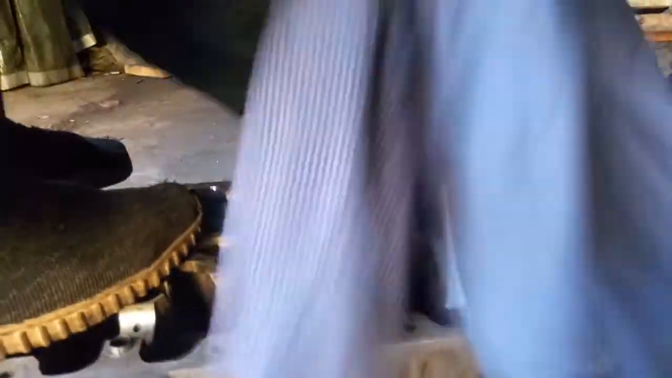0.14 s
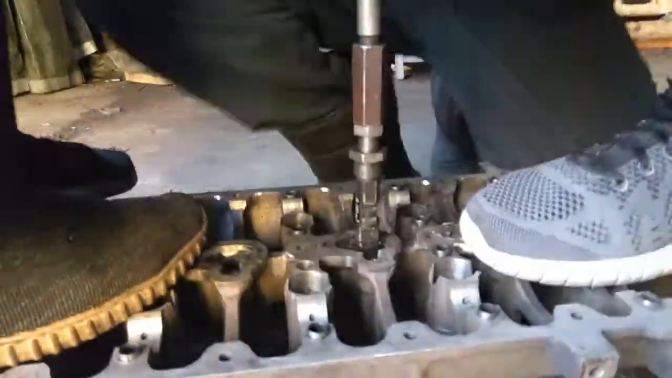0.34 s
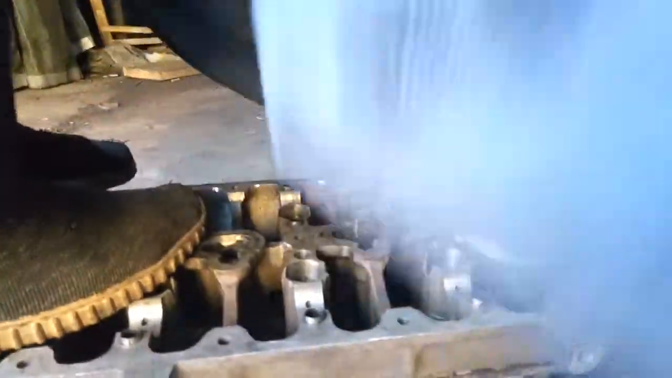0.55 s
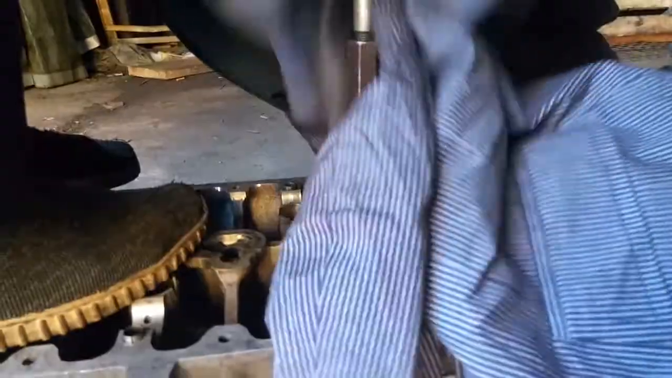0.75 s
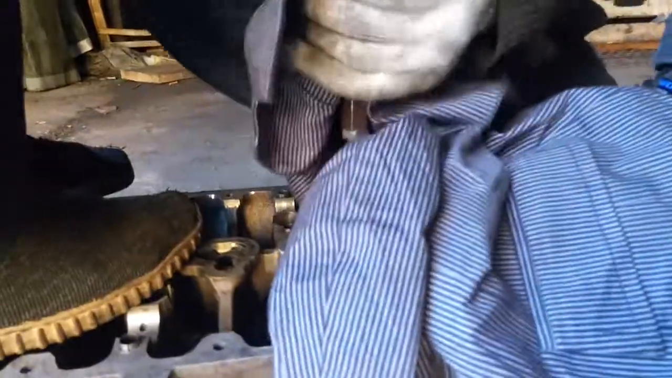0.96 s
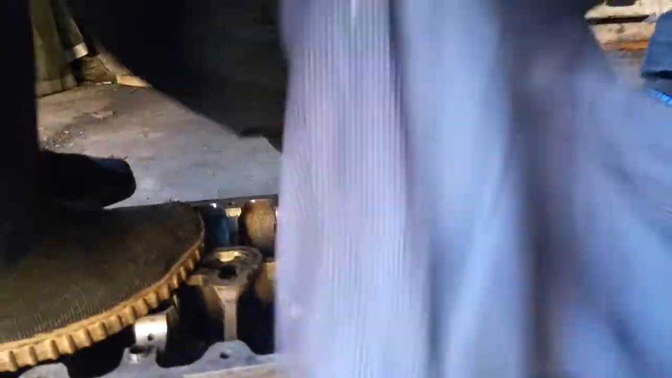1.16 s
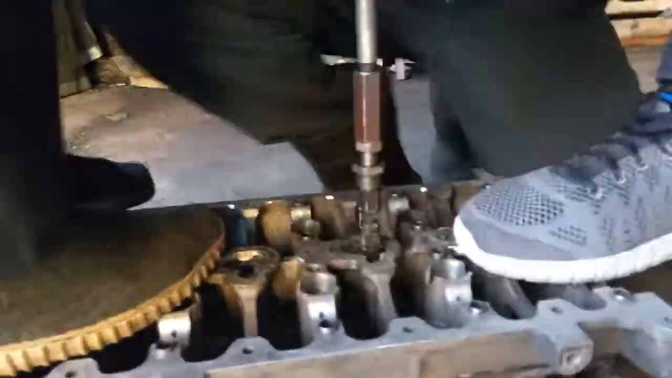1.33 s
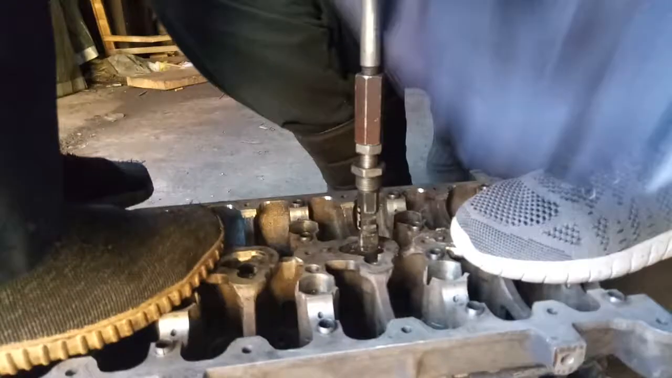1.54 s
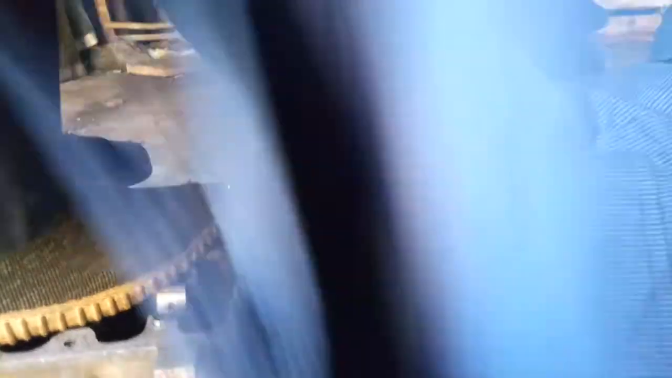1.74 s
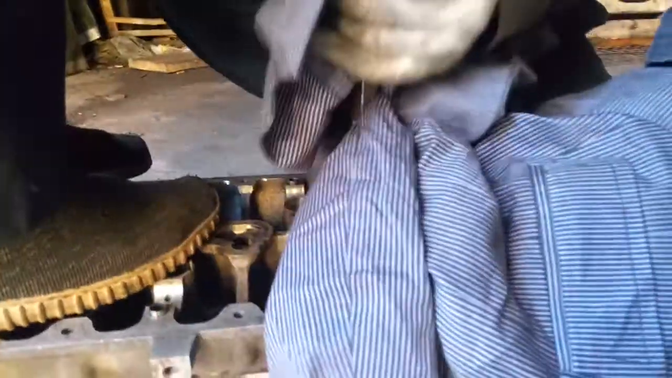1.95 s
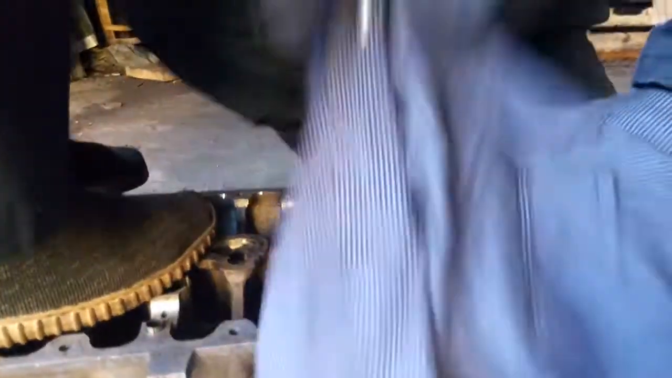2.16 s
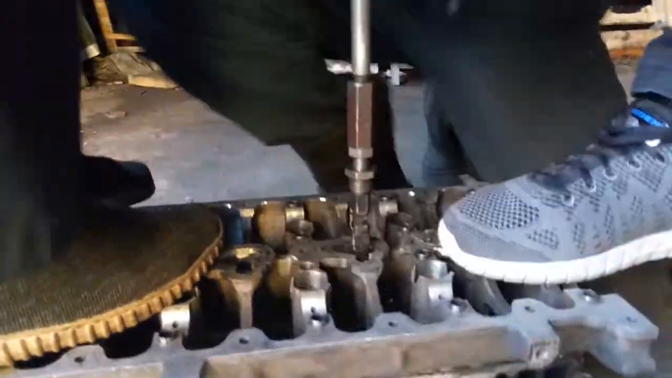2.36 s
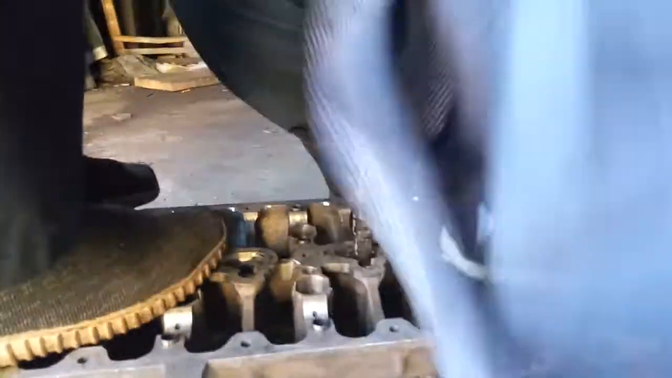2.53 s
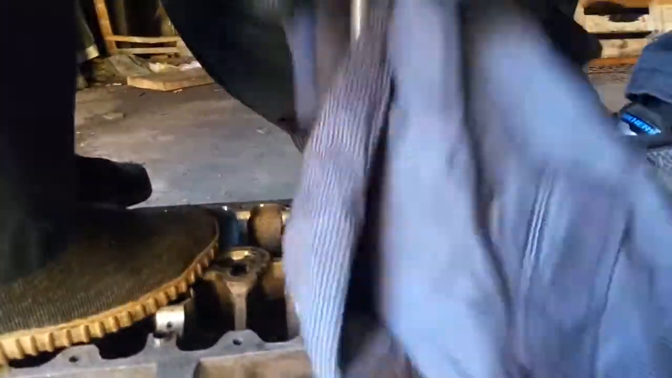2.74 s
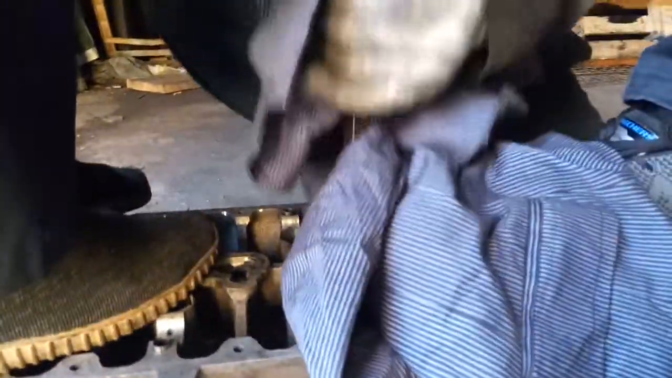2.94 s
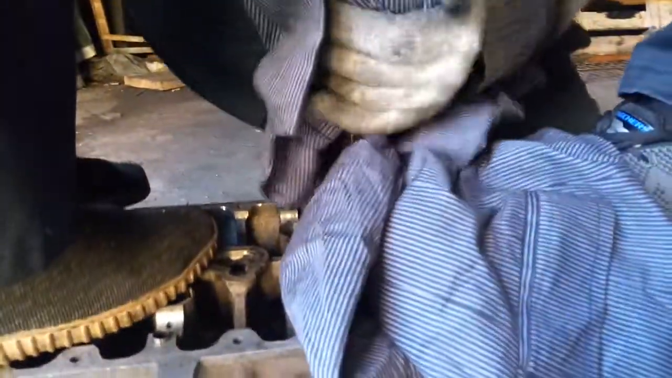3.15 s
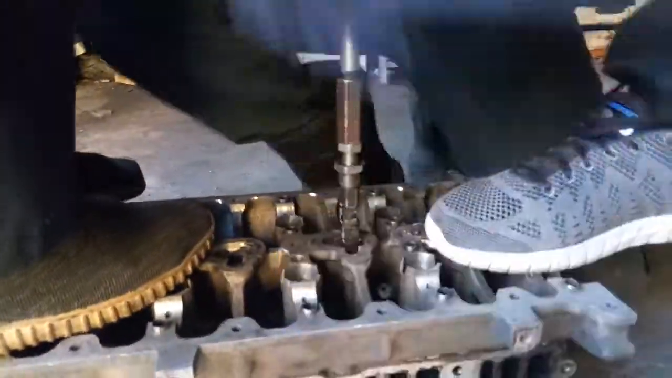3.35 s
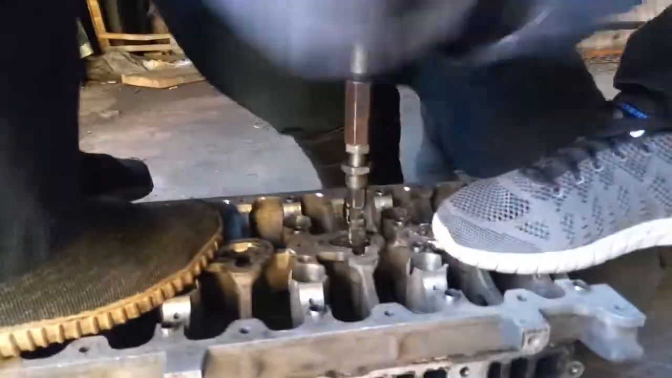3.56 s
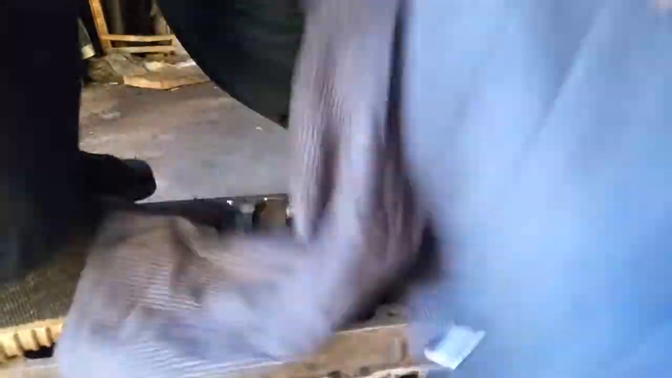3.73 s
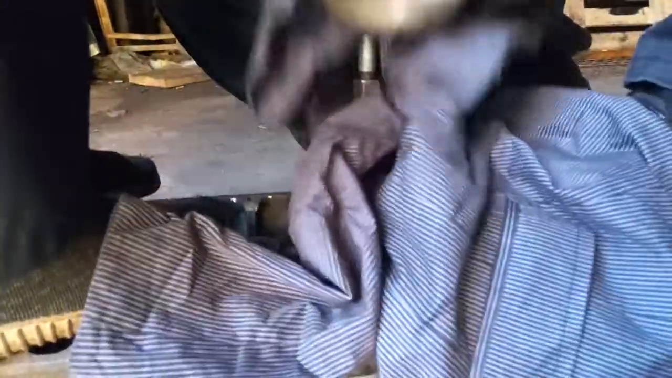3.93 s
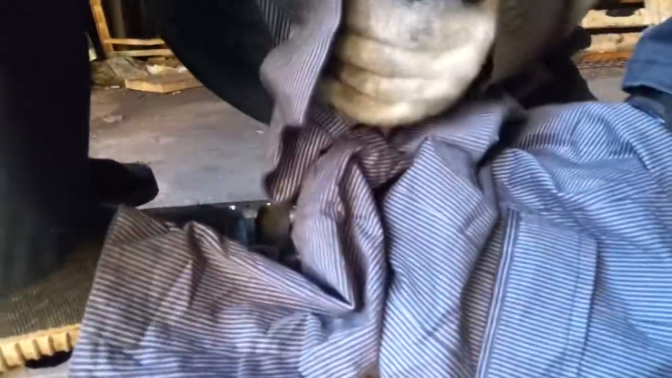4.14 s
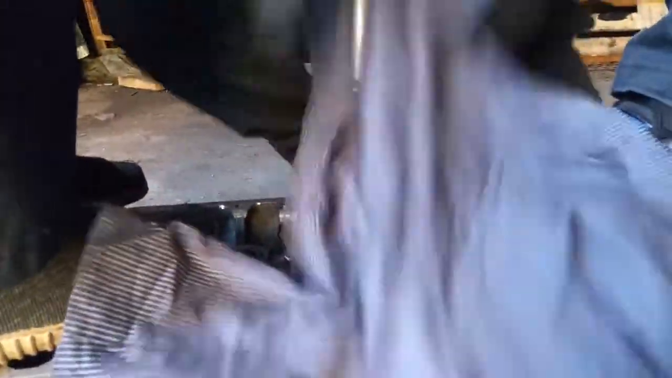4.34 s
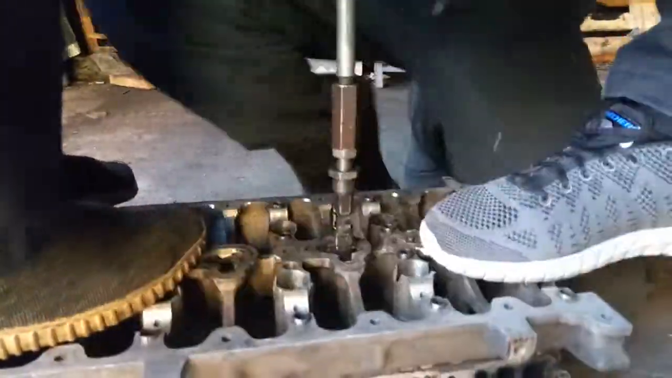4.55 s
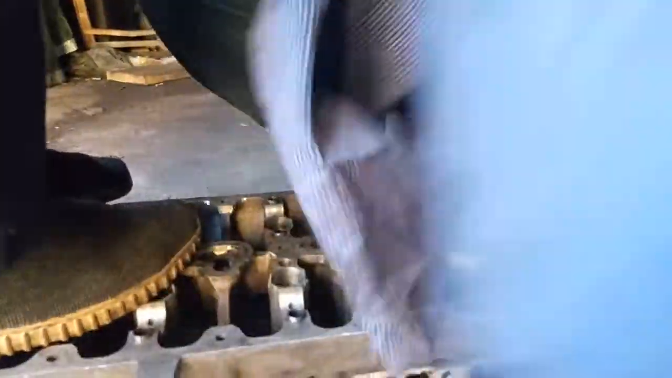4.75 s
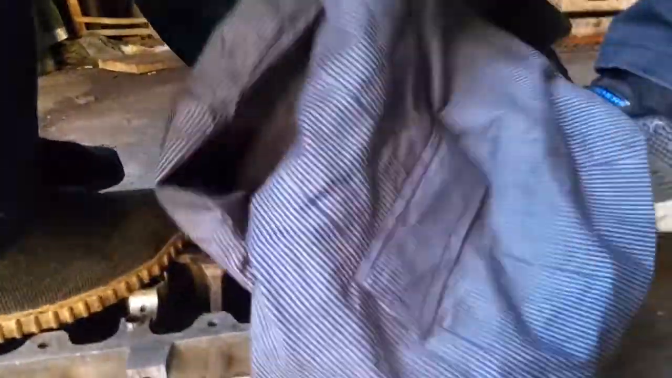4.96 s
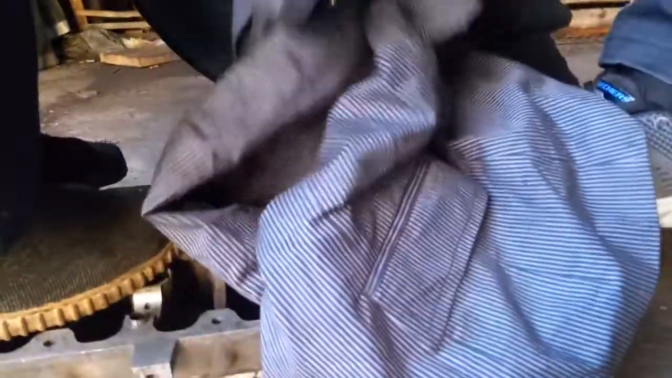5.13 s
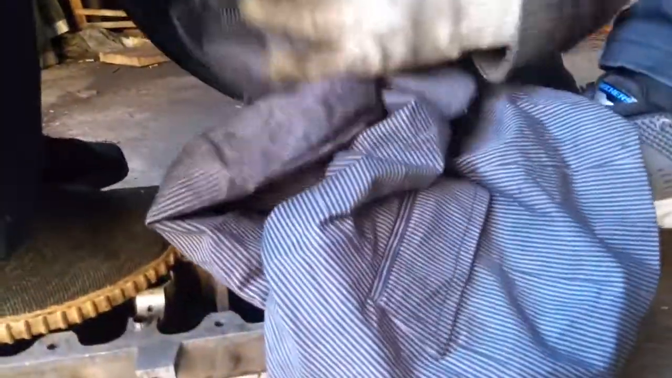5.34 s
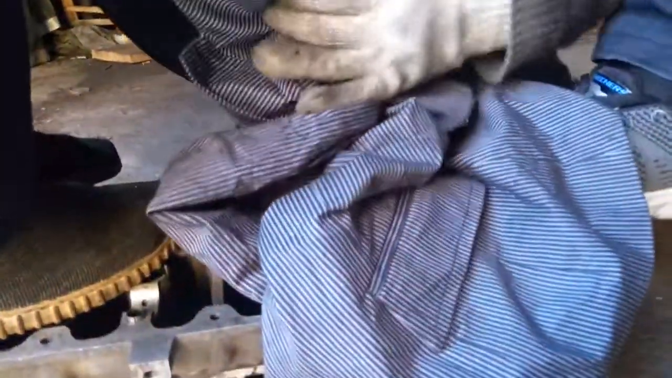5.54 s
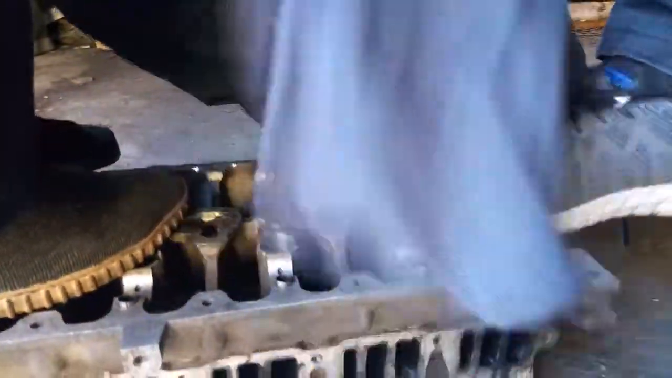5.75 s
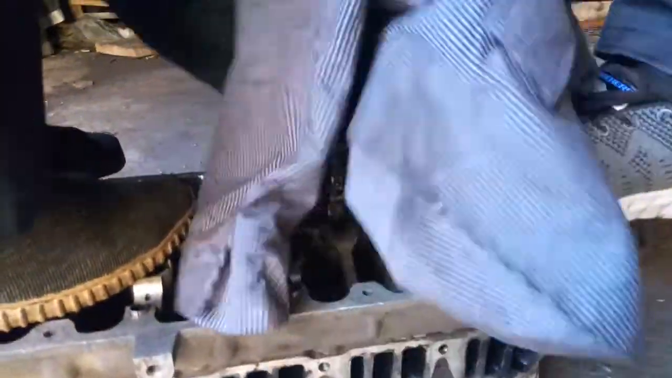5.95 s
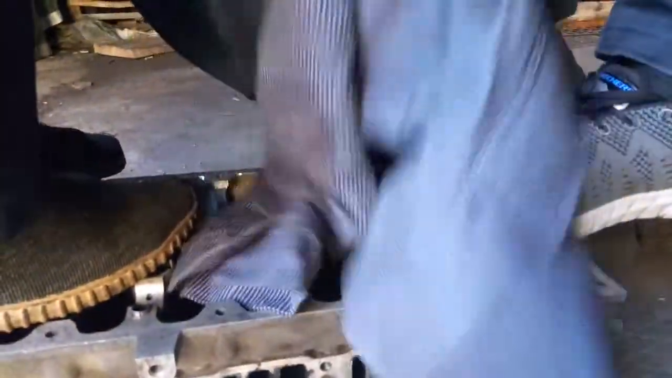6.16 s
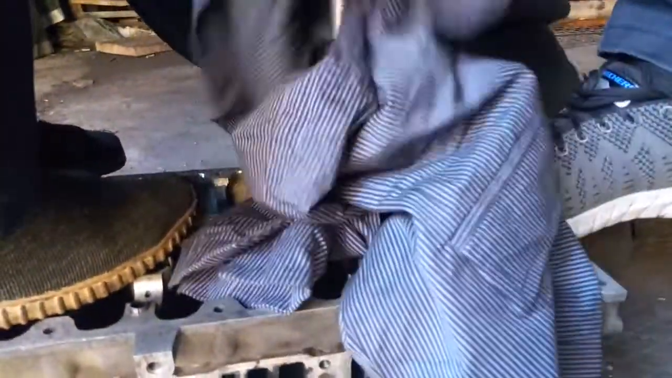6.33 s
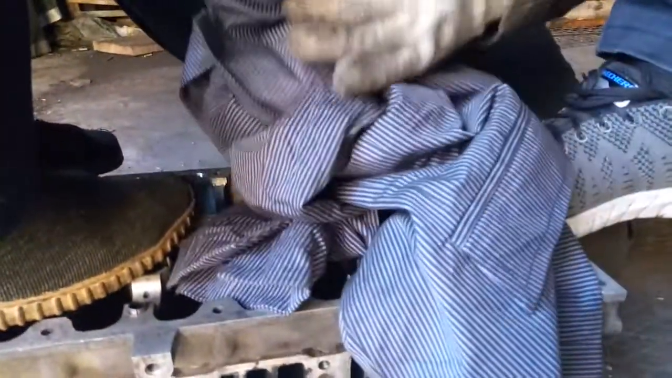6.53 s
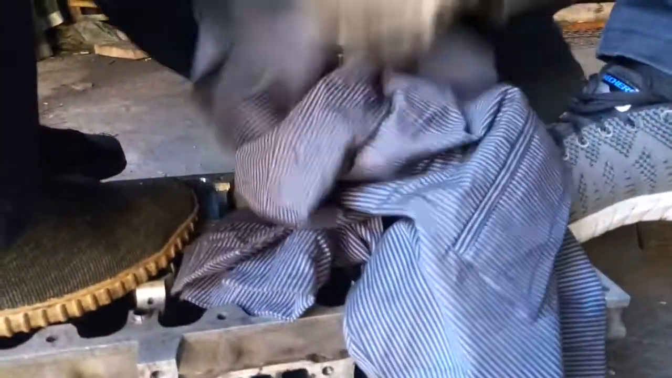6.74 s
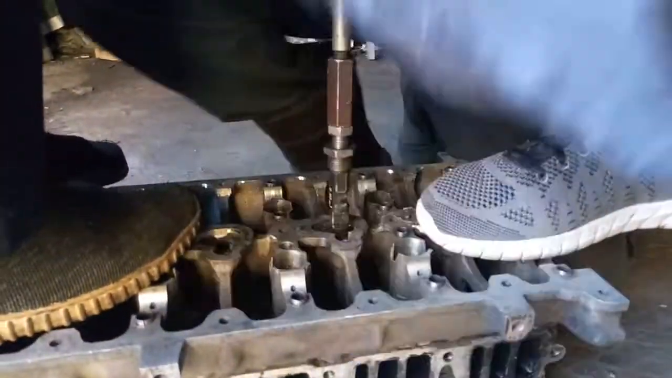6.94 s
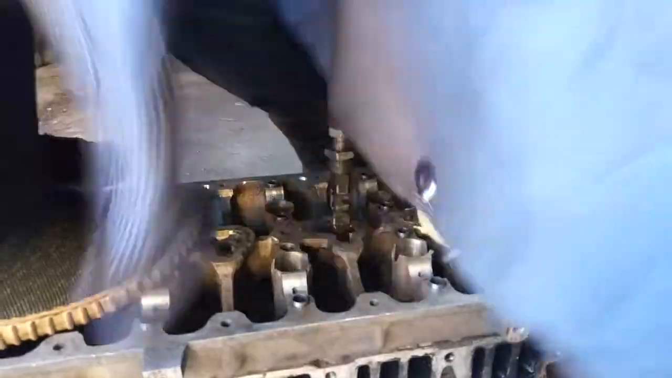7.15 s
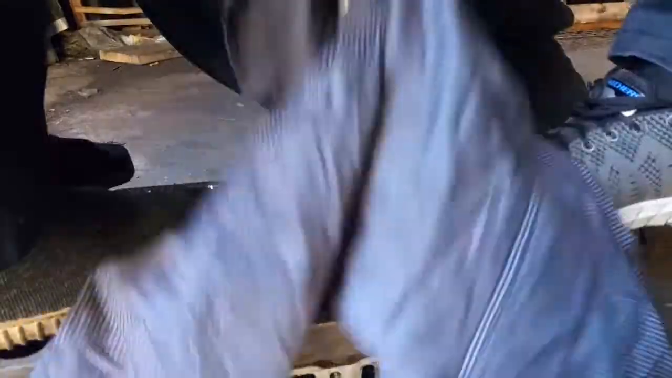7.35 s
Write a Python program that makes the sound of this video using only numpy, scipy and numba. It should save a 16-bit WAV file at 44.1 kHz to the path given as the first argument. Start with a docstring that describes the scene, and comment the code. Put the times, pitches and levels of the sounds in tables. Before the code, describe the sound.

A slide hammer slams its stop seven times, about once a second, with loud ringing metal clanks and soft scraping in a reverberant workshop.

```python
"""A slide hammer strikes its stop seven times, pulling at an injector stuck in a cylinder head.
Each impact excites the modes of the steel and lifts the head, which lands with a thud.
Friction makes the rod scrape and sing as the weight slides up; the weight then rattles back down.
The hard-walled workshop reverberates over low noise and a machine's drone. A nearby phone's
gain control ducks each blow and, as it recovers, holds the level of the reverberation for a moment."""
import sys
import numpy as np
from scipy import signal
from scipy.fft import rfft, irfft
from scipy.io import wavfile
from scipy.ndimage import uniform_filter1d, minimum_filter1d
from numba import njit

SR = 44100
rng = np.random.default_rng(int(sys.argv[2]) if len(sys.argv) > 2 else 0)


def store_pcm(level_fs):
    """Save levels as 16-bit WAV."""
    pcm = np.round(np.clip(level_fs, -1, 1) * 32767).astype(np.int16)
    wavfile.write(sys.argv[1], SR, np.atleast_2d(pcm).T)


N = 325897

# Strokes: impact t/s, level/dB, seating of the weight (-1..1), relative thump level/dB,
# contact chatter/s, flight of the head/s, length of the pull/s, singing level/dB
STROKES = [(.269, 0, -0.33, -6, 0.017, 0.046, 0.13, -29), (1.3066, 1, 1, -10, 0.013, .051, 0.13, -25),
           (2.3348, 1.5, 0.97, -16, 0.012, 0.057, .13, -19.5),
           (3.404, 1.5, 0.51, -4.5, 0.011, 0.051, 0.14, -23.5),
           (4.4969, 0.5, 0.73, -3, 0.017, .053, .133, -19.5),
           (5.835, 0, -.6, -15.5, .021, 0.057, 0.13, -29),
           (6.9408, 2.5, 1, -5.5, 0.0099, 0.048, 0.14, -22.5)]
# Slides back down the rod: t/s, length/s, scrape level/dB, singing level/dB
RETURN_SLIDES = [(0.589, .44, -45.5, -38.5), (1.498, 0.49, -44, -43), (2.574, 0.51, -47.5, -49.5),
                 (3.617, 0.48, -50.5, -44.5), (4.855, .52, -51, -56), (6.238, 0.33, -47.5, -44.5)]
# Modes of the rod when rubbed or tapped: f/Hz, level/dB, T60/s
ROD_MODES = [(734, -13.5, 0.25), (1838, 1.5, 0.059), (2569, -0.5, 0.071), (3010, -7, .03),
             (3290, -3, 0.022), (3766, 1.5, 0.041), (4234, 2.5, 0.055), (4620, -3.5, 0.016),
             (4970, 1.5, 0.082), (5300, -4.5, 0.021), (6020, -9, 0.06), (6470, -4.5, 0.03),
             (8000, -36, .025), (9700, -11.5, 0.039), (11000, -22, .02)]
# Spectrum of steel rubbing on steel: f/Hz, spectral level/dB
FRICTION_SPECTRUM = [(80, -8.5), (400, -2), (1300, -10), (3000, -11.5), (5000, 0.5), (6700, -0.5),
                     (7800, -12.5), (10000, -14), (12500, -20), (15000, -23.5)]


def blows():
    """Impact excitation: the weight chatters on the stop, then the steel's modes decay freely."""
    # Modes of puller and injector: f/Hz, level/dB, T60/s, gain per unit of seating/dB
    puller_modes = [(426, -17.5, 0.054, -8), (440, -9.5, 0.054, 5), (540.6, -13, 0.15, -3),
                    (897, -36.5, 0.26, 9), (1452, -13.5, 0.2, -1.5), (2467, -15.5, 0.23, 0),
                    (2700, -7.5, 0.035, 0.5), (3024, -16, 0.13, 1.5), (3694, -11, 0.091, 1.5),
                    (4750, -39, 0.17, -1.5), (4920, -28.5, .1, -4.5), (4780, -14.5, 0.16, 10.5),
                    (4820, -10.5, 0.068, 12.5), (5185, -5, 0.063, -3), (5610, -19.5, .12, 16.5),
                    (5890, -21.5, 0.62, -12.5), (6115, -11.5, .1, -11.5), (6450, -12.5, .08, -7.5),
                    (6000, -8, .12, -10.5), (6430, -9.5, .11, -12.5), (9030, -19.5, .15, 7),
                    (9200, -16, .04, -0.5)]
    # Densely overlapping modes of steel and casting: f/Hz, spectral level/dB
    crash_spectrum = [(60, -2.5), (170, 4.5), (290, 1.5), (430, 8), (650, 5.5), (1100, 2), (1900, 3),
                      (2200, -2.5), (3300, -2), (5300, 9.5), (6700, 5.5), (7600, -3), (9800, -1.5),
                      (13500, -12)]
    out, t = np.zeros(N), clock(0.63)
    hz, db, t60, seating_db = np.transpose(puller_modes)[:, :, None]
    attack = 1 - np.exp(-t / 0.004)
    for s, level_db, seating, thump_db, chatter, *_ in STROKES:
        mode_db = db + seating_db * seating
        steel = ring(t, hz, mode_db, t60, hold=chatter / 2, scatter_db=1.5, detune=0.0012) * attack
        crash = noise(crash_spectrum, len(t)) * fade(t - chatter, 0.099)
        thump = undb(thump_db - 4) * thud(t, hz=147, t60=0.045)
        add(out, s, undb(level_db) * (undb(-2.5) * crash + undb(-4.5) * steel) + thump)
    return out


def knocks():
    """Secondary impacts: the lifted head lands and rocks on the floor."""
    # Rocking of the head: t/s, level/dB
    bumps = [(.529, -16.5), (.574, -25.5), (1.687, -23.5)]
    # Crack of the landing: f/Hz, spectral level/dB
    crack_spectrum = [(100, -4.5), (600, 8), (1900, 6), (3500, 0.5), (6000, -22), (14000, -41)]
    out, t = np.zeros(N), clock(0.25)
    floor = thud(t, hz=110.5, t60=0.053)
    for s, *_, flight, _, _ in STROKES:
        crack = noise(crack_spectrum, len(t)) * fade(t, 0.022)
        clang = np.sin(2 * np.pi * 1820 * t) * fade(t, 0.017)  # the rod's lowest strong mode
        add(out, s + flight, undb(-15.5) * floor + undb(-7) * crack + undb(-9.5) * clang)
    for s, db in bumps:
        add(out, s, undb(db) * floor)
    return out


def pulls():
    """Sliding friction under uniform acceleration: scrape and singing grow with the weight's speed."""
    travel, force, singing = np.zeros((3, N))
    for s, *_, length, sing_db in STROKES:
        speed = clock(length) / length
        release = 1 - speed ** 5.1  # the singing dies just short of the stop
        add(travel, s - length, speed ** 2)
        add(force, s - length, speed ** 1.42)
        add(singing, s - length, undb(sing_db) * speed ** 0.98 * release)
    grip = undb(3.5 * drift(130))  # uneven friction
    rub = undb(-28) * rod_rub(force * grip)
    hiss = undb(-27) * force * grip * noise(FRICTION_SPECTRUM, N)
    return rub + hiss + singing * np.sqrt(grip) * rod_song(travel, rasp=0.029, db_per_octave=4)


def returns():
    """Unsteady friction: the weight scrapes back down, squeaking as it slows; a shirt rustles along."""
    # Brushing of the loose shirt: f/Hz, spectral level/dB
    cloth_spectrum = [(100, -8), (700, 5.5), (1400, -2.5), (3000, -21), (6300, 2.5), (8000, -12),
                      (10000, -10), (13000, -17), (15000, -13)]
    travel, force, singing, brushing = np.zeros((4, N))
    for s, length, db, sing_db in RETURN_SLIDES:
        add(travel, s, (1 - clock(length) / length) ** 1.3)
        add(force, s, undb(db) * arch(length))
        add(singing, s, undb(sing_db) * arch(length))
        add(brushing, s, undb(db) * arch(length + 0.037))  # the shirt settles after the weight
    rub = undb(-4.5) * rod_rub(force * undb(7.4 * drift(75)))
    bursts = singing * (1 - travel) ** 2.1 * undb(3.5 * drift(30))
    squeaks = bursts * rod_song(travel, rasp=0.036, db_per_octave=-2.5)
    rustle = undb(-2.5) * brushing * undb(1.1 * drift(25)) * noise(cloth_spectrum, N)
    return rub + squeaks + rustle


def rod_rub(force):
    """Forced vibration: dense friction pulses are convolved with the rod's impulse response."""
    grit = unit(rng.standard_normal(N) * undb(2 * rng.exponential(size=N)))
    hz, db, t60 = np.transpose(ROD_MODES)[:, :, None]
    response = ring(clock(0.15), hz, db, t60, hold=0, scatter_db=0, detune=0)
    return signal.fftconvolve(force * grit, response / np.linalg.norm(response))[:N]


def rod_song(travel, rasp, db_per_octave):
    """Friction-driven bending tones rise with travel (0..1) to the stop; rasp is their pitch jitter."""
    # Bending tones with the weight at the bottom: f/Hz, level/dB
    bending_tones = [(610, -1), (1700, 2), (2640, 1), (4080, -7)]
    # Radiation efficiency of the rod: f/Hz, level/dB
    radiation = [(650, -5), (1000, -11.5), (1600, -18.5), (2200, -16.5), (2900, -3), (4100, -3),
                 (5200, -7.5), (6500, -4), (8000, -21.5), (13000, -33)]
    glide_octaves, pivot_hz, flutter_db = 2.38, 3000, 4.5
    band_hz, band_db = np.transpose(radiation)
    out = np.zeros(N)
    for rest_hz, db in bending_tones:
        hz = np.minimum(rest_hz * 2 ** (glide_octaves * travel), SR / 2)
        phase = 2 * np.pi * np.cumsum(hz * (1 + rasp * drift(1100))) / SR
        radiated_db = np.interp(np.log(hz), np.log(band_hz), band_db)
        tilt_db = db_per_octave * np.log2(hz / pivot_hz)
        out += undb(db + radiated_db + tilt_db + flutter_db * drift(300)) * np.sin(phase)
    return out


def rattles():
    """Impacts across a clearance: the loose weight taps the rod, on the pull harder as it speeds up."""
    # Distinct knocks of weight on rod: t/s, level/dB, length/s
    hard_knocks = [(0.248, -22.5, 0.0052), (0.648, -30.5, 0.024), (.769, -40, .03), (0.855, -28.5, 0.0044),
                   (1.223, -30.5, 0.0052), (1.258, -18.5, 0.0069), (1.281, -17, 0.0065),
                   (1.665, -29, 0.066), (1.78, -30, 0.012), (1.857, -32, .003), (2.695, -29, 0.018),
                   (2.901, -32, 0.0092), (3.758, -29, 0.009), (6.305, -33.5, 0.018), (6.381, -19.5, 0.0069),
                   (6.432, -31.5, 0.013)]
    cock_lead_s = 0.015  # the weight cocks on the rod just before each blow
    out = np.zeros(N)
    for s, level_db, length in hard_knocks:
        add(out, s, clink(level_db, length, detune=0.02))
    for s, *_, length, _ in STROKES:
        add(out, s - cock_lead_s, clink(-18.5, length=0.01))
        for progress, scatter_db in contacts(length, per_second=55):
            onset = s - length + progress * (length - cock_lead_s)
            add(out, onset, progress ** 3 * clink(-23.5 + scatter_db))
    for s, length, db, _ in RETURN_SLIDES:
        for progress, scatter_db in contacts(length, per_second=27):
            swell = np.sqrt(np.sin(np.pi * progress))
            add(out, s + length * progress, swell * clink(db + 4.5 + scatter_db))
    return out


def clink(level_db, length=0.011, detune=0.035):
    """Contact excitation: a harder tap is brighter, and the modes shift with the point of contact."""
    t = clock(0.15)
    hz, db, t60 = np.transpose(ROD_MODES)[:, :, None]
    hardness = np.clip((level_db + 35) / 15, 0, 1)
    ping_db = 10 * hardness * (np.abs(hz - 6400) < 500)
    ping = ring(t, hz, db + ping_db, t60, hold=length / 2, scatter_db=4, detune=detune)
    buzz = noise(FRICTION_SPECTRUM, len(t)) * fade(t - length / 2, 0.022) * (0.3 + 0.7 * hardness)
    attack = 1 - np.exp(-t / 0.001)
    return undb(level_db - 9) * (ping + buzz) * attack


def contacts(length, per_second):
    """A jittered pulse train along a slide; columns: share of its length, relative level/dB."""
    jitter, scatter_db = rng.random(24), 2.5 * rng.standard_normal(24)
    progress = (np.arange(len(jitter)) + jitter) / (per_second * length)
    return np.transpose([progress, scatter_db])[progress < 1]


def clicks():
    """Broadband transients: a few faint, sharp, high clicks."""
    # Clicks: t/s, level/dB
    onsets = [(.886, -29.5), (3.615, -16.5), (4.365, -34.5)]
    spectrum = [(1000, -23.5), (7000, 0), (11000, 7.5), (15000, 1.5)]  # f/Hz, spectral level/dB
    out, t = np.zeros(N), clock(0.25)
    for s, db in onsets:
        add(out, s, undb(db) * noise(spectrum, len(t)) * fade(t, 0.0035))
    return out


def hall(x):
    """Reverberation: diffuse reflections build up, then decay exponentially at each band's own rate."""
    # Reverberant field: f/Hz, level against the direct sound/dB, T60/s
    bands = [(60, -10.5, 1.2), (174, -20, 0.2), (273, -6, 1.67), (447, 0, 0.78), (720, -2, 0.99),
             (1220, -9, 1.27), (2500, -7.5, 1.054), (3240, -11, 1.03), (5300, -10.5, 0.73),
             (9000, -13, 0.53), (15000, -20.5, .55)]
    t = clock(1.8)
    hz, db, t60 = np.transpose(bands)
    white = rfft(rng.standard_normal(len(t)))
    log_f = np.log(np.fft.rfftfreq(len(t), 1 / SR) + 1)
    build_up = 1 - np.exp(-(t / 0.028) ** 2)
    response = np.zeros(len(t))
    for band, band_db, band_t60 in zip(np.eye(len(hz)), db, t60):
        decay = fade(t, band_t60) * build_up
        band_noise = irfft(white * np.interp(log_f, np.log(hz), band), len(t))
        response += undb(band_db) * decay / np.linalg.norm(decay) * band_noise
    # A diffuse field favours no single note: even out its narrow peaks.
    spectrum = rfft(response, 2 * len(t))
    narrow, broad = (uniform_filter1d(np.abs(spectrum) ** 2, size=bins) for bins in (90, 500))
    response = irfft(spectrum * np.sqrt(broad / narrow))[:len(t)]
    return signal.fftconvolve(x, response)[:N]


def workshop():
    """Ambient noise under a machine's two amplitude-modulated tones, each swelling once."""
    # Background noise: f/Hz, spectral level/dB
    ambient_spectrum = [(25, -32.5), (60, -8.5), (150, -8.5), (480, -19), (900, -19.5), (2000, -28),
                        (3000, -33), (5000, -34), (7000, -38), (8500, -51), (14000, -48)]
    # Machine tones: f/Hz, steady level/dB, top of the swell t/s, hold/s, swell level/dB
    drone_tones = [(138, -57.5, 0, 0.26, -43), (99.8, -55.5, 4.0, .4, -41.5)]
    attack_s = 0.21
    t = np.arange(N) / SR
    out = undb(-44) * noise(ambient_spectrum, N) * undb(0.25 * drift(1.9))
    for hz, steady_db, s, hold, swell_db in drone_tones:
        swell = np.clip((t - s) / attack_s + 1, 0, 1) * fade(t - s - hold, t60=2.4)
        phase = 2 * np.pi * np.cumsum(hz * (1 + 0.012 * drift(9))) / SR
        rms = (undb(steady_db) + undb(swell_db) * swell) * undb(1.6 * drift(5.8))
        out += np.sqrt(2) * rms * np.sin(phase)
    return out


def ring(t, hz, db, t60, hold, scatter_db, detune):
    """Modal superposition: randomly perturbed modes are sustained for hold seconds, then decay."""
    shift, scatter, phase = rng.standard_normal((len(hz), 3)).T[:, :, None]
    partials = np.sin(2 * np.pi * (hz * (1 + detune * shift) * t + phase)) * fade(t - hold, t60)
    return (undb(db + scatter_db * scatter) * partials).sum(0)


def thud(t, hz, t60):
    """A heavily damped oscillation: a few low cycles with a soft onset."""
    return 2 * np.sin(2 * np.pi * hz * t) * fade(t, t60) * (1 - np.exp(-t / 0.005))


def noise(points, size):
    """Spectrally shaped noise of rms 1; points are f/Hz, spectral level/dB."""
    hz, db = np.transpose(points)
    f = np.fft.rfftfreq(size, 1 / SR)
    gain = undb(np.interp(np.log(f + 1), np.log(hz), db))
    return unit(irfft(rfft(rng.standard_normal(size)) * gain, size))


def drift(rate):
    """Random modulation of rms 1, interpolated between rate values a second."""
    t = np.arange(N) / SR
    return unit(np.interp(t * rate, np.arange(N // 10), rng.standard_normal(N // 10)))


def arch(length):
    """An envelope shaped as a broadened half sine."""
    return np.sin(np.pi * clock(length) / length) ** 0.85


def fade(t, t60):
    """Exponential decay from t = 0, by 60 dB in t60 seconds."""
    return np.exp(-np.log(1000) * np.maximum(t, 0) / t60)


def undb(db):
    """Amplitude ratio of a level."""
    return 10 ** (np.asarray(db) / 20)


def unit(x):
    """Normalisation to rms 1."""
    return x / np.sqrt(np.mean(x ** 2))


def clock(length):
    """Sample times over length seconds."""
    return np.arange(int(length * SR)) / SR


def add(out, s, x):
    """Superposition of x on out from time s."""
    i = max(int(s * SR), 0)
    out[i:i + len(x)] += x[:max(len(out) - i, 0)]


def scene():
    """Direct sound, reverberation and background add; sliding stirs the hall less than the blows do."""
    transients = blows() + knocks() + clicks()
    sliding = pulls() + returns() + rattles()
    reverberation = hall(transients + undb(-3) * sliding)
    return (transients + sliding + reverberation + workshop())[None]


@njit
def slew(wanted_db, fall, rise):
    """Slew-rate limiting: the gain follows wanted_db by at most fall or rise dB a second."""
    out, gain_db = np.empty(len(wanted_db)), 0.0
    for i in range(len(wanted_db)):
        gain_db += min(max(wanted_db[i] - gain_db, -fall / SR), rise / SR)
        out[i] = gain_db
    return out


def gain_control(x, target_db, fall_db_per_s, rise_db_per_s):
    """Compression: the gain falls while the short-term level is above the target, then recovers."""
    level_db = 10 * np.log10(np.abs(uniform_filter1d(x ** 2, size=256)) + 1e-12)
    wanted_db = np.minimum(target_db - level_db, 0)
    return x * undb(slew(wanted_db, fall_db_per_s, rise_db_per_s))


def limit(x, samples):
    """Look-ahead limiting: a smoothed gain holds the peaks at full scale."""
    gain = minimum_filter1d(1 / np.maximum(np.abs(x), 1), samples)
    return x * uniform_filter1d(gain, samples)


def record(dry):
    """Resonance of the microphone port, then gain control, peak limiting and a steep low-pass."""
    port_hz, port_width_hz, cutoff_hz = 15100, 900, 15550
    port = signal.iirpeak(port_hz, port_hz / port_width_hz, fs=SR)
    x = dry[0] + undb(3) * signal.lfilter(*port, dry[0])
    x = gain_control(x, target_db=-13, fall_db_per_s=372.0, rise_db_per_s=79.0)
    x = limit(x, samples=24)
    low_pass = signal.ellip(10, 0.2, 70, cutoff_hz, fs=SR, output="sos")
    return signal.sosfilt(low_pass, x)[None]


dry = scene()
out = record(dry)
store_pcm(out)
```